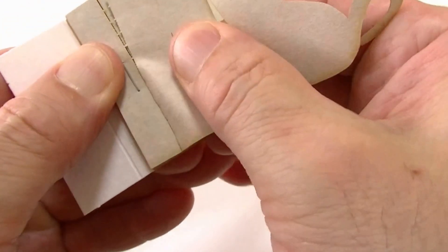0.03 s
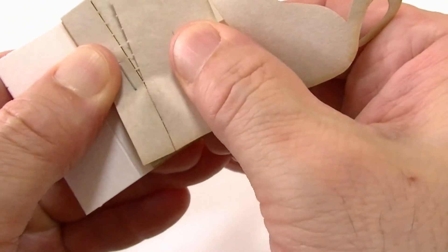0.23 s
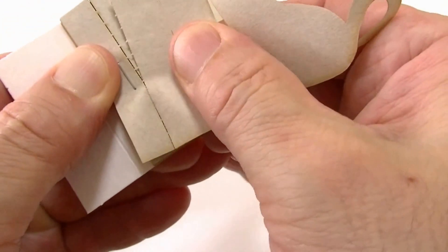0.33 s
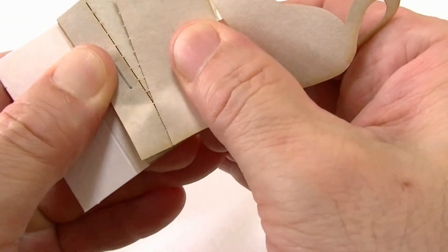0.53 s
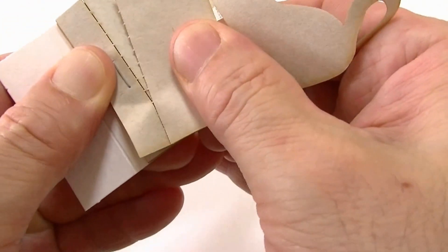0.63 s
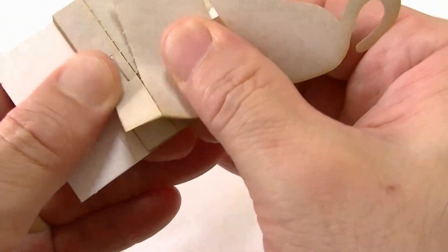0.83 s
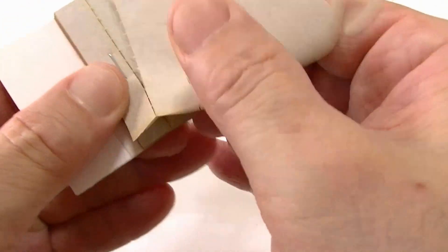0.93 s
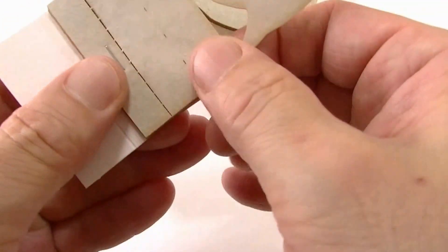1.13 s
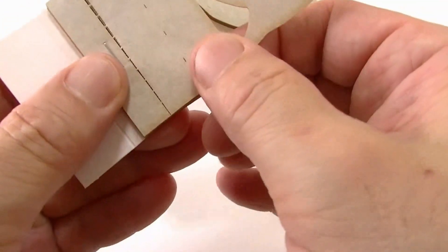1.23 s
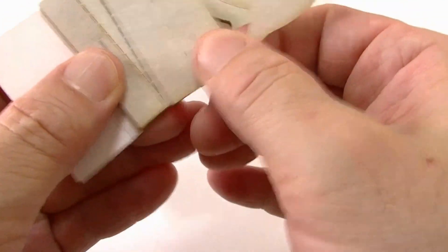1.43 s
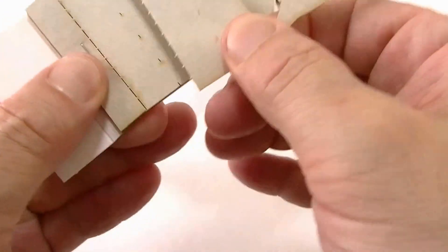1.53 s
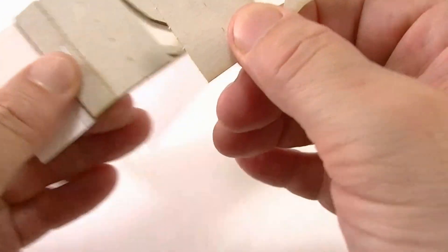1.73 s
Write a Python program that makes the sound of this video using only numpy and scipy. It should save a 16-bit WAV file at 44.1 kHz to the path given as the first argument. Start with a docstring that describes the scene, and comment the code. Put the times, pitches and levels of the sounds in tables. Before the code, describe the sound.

Stiff card tears along a perforation, close up in a small, quiet room. A sharp, slightly hollow snap comes at about 0.2 seconds, and a second cluster follows at around 0.5 seconds. Light fibre ticks and faint rustles of card sliding over card and skin run from 0.8 to 1.4 seconds. A final, slightly softer crackling snap lands at 1.5 seconds, followed by a tick and a faint brush.

```python
"""Stiff card torn along a perforation, bent between two hands close to the microphone.
The bridges between the holes snap in three groups; each snap is a burst of breaking fibres that
flexes the sheet and sets it ringing. In between, single fibres tick and card slides over card and skin.
A small, quiet room answers."""
import sys
import numpy as np
from scipy import signal
from scipy.fft import rfft, irfft
from scipy.io import wavfile
from scipy.ndimage import uniform_filter1d

SR = 44100
rng = np.random.default_rng(int(sys.argv[2]) if len(sys.argv) > 2 else 0)


def generate_wav(signal):
    """Clip the signal to [-1, 1] and save it as 16-bit WAV at the path in sys.argv[1]."""
    frames = np.transpose(np.atleast_2d(signal))
    scaled = np.clip(frames, -1, 1) * 32767
    pcm = np.round(scaled).astype(np.int16)
    wavfile.write(sys.argv[1], SR, pcm)


N = 79380
TIME = np.arange(N) / SR
HZ = np.maximum(np.arange(N // 2 + 1) * SR / N, 1)


def from_db(db):
    """Decibels to gain."""
    return 10 ** (np.asarray(db) / 20)


def unit_rms(x):
    """Scale to an rms of 1."""
    return x / np.sqrt(np.mean(x ** 2) + 1e-20)


def curve(points):
    """Join (Hz, value) points along the log-frequency axis."""
    hz, value = np.transpose(points)
    return np.interp(np.log(HZ), np.log(hz), value)


def bell(hz, octaves):
    """A bell of height 1 around a frequency."""
    return np.exp(-.5 * (np.log2(HZ / hz) / octaves) ** 2)


def equalise(x, db):
    """Minimum-phase EQ with the given gain at each frequency."""
    cepstrum = irfft(np.log(from_db(db)), N)
    cepstrum[1:N // 2] *= 2
    cepstrum[N // 2 + 1:] = 0
    return irfft(rfft(x) * np.exp(rfft(cepstrum)), N)


def stereo_noise(correlation):
    """White noise with the given left-right correlation."""
    mid, side = rfft(rng.standard_normal((2, N)))
    mid_gain, side_gain = np.sqrt((1 + correlation) / 2), np.sqrt((1 - correlation) / 2)
    return irfft(mid_gain * mid + side_gain * side * [[1], [-1]], N)


def room_tone(level_db=-60):
    """A faint, dark bed of air, narrow in the mids and wide at both ends of the spectrum."""
    # Each row: frequency in Hz, gain in dB.
    colour = [(30, -43), (70, -22), (120, -16.5), (200, -7.5), (400, -5.5), (650, -4), (900, 0.5),
              (1500, -7.5), (2500, -13.5), (5000, -19.5), (9000, -24), (15000, -31), (16500, -32)]
    # Each row: frequency in Hz, left-right correlation.
    correlation = [(50, 0), (150, 0.55), (600, 0.69), (2000, 0.55), (6000, 0), (14000, 0)]
    air = equalise(stereo_noise(curve(correlation)), curve(colour))
    return from_db(level_db) * unit_rms(air)


def card_slides(grains_per_s=3600):
    """Friction: dense catching fibres over a fine hiss; each stroke rasps at a resonance of its own."""
    # Each row: start, rise, hold and fall in seconds, level in dB, treble tilt in dB per octave,
    # rasp pitch in Hz, rasp boost in dB.
    strokes = [(0.073, .012, 0.034, 0.013, -70, -3, 3740, 5),
               (0.186, 0.015, .004, 0.0051, -52.5, 6.5, 5500, -3),
               (0.42, 0.017, 0.0072, 0.012, -66.5, -1, 5700, 10),
               (0.484, 0.019, 0.033, 0.015, -55.5, 5, 6000, -3),
               (0.603, 0.022, 0.0046, 0.028, -58.5, 0, 3030, 0),
               (0.755, 0.023, 0.0076, 0.025, -59.5, -0.5, 5540, 5),
               (0.874, 0.015, 0.044, 0.028, -52.5, 2, 5200, 7.5),
               (0.919, 0.016, 0.0056, 0.015, -51, 3.5, 3630, 6),
               (0.955, 0.015, 0.15, 0.1, -63.5, -2, 3660, 1),
               (1.005, .012, 0.0082, 0.015, -47.5, 5.5, 4500, 6),
               (1.017, 0.0027, 0.0012, 0.0029, -39.5, 2.5, 4440, 12),
               (1.192, 0.0096, .004, 0.013, -53, -10.5, 5080, 19),
               (1.196, 0.014, 0.0045, 0.013, -54, -2.5, 824, 10),
               (1.47, 0.019, .012, .008, -51.5, 8, 8500, 2),
               (1.723, 0.042, 0.0082, 0.026, -49.5, 4, 6100, 8)]
    # The tone all strokes share. Each row: frequency in Hz, gain in dB.
    base_colour = [(100, -40), (330, 1), (900, 4.5), (1500, -1.5), (2400, 5), (5500, -1.5), (8000, -4.5),
                   (12000, -7.5), (15000, -17), (16500, -33)]
    out = 0
    for start, rise, hold, fall, db, tilt_db, rasp_hz, rasp_db in strokes:
        grains = rng.standard_normal(N) * (rng.random(N) < grains_per_s / SR)
        friction = unit_rms(grains) + rng.standard_normal(N)
        envelope = np.interp(TIME, start + np.cumsum([0, rise, hold, fall]), [0, 1, 1, 0])
        tilt = tilt_db * np.log2(1 + HZ / 1000)
        colour = curve(base_colour) + tilt + rasp_db * bell(rasp_hz, octaves=0.12)
        scrape = irfft(rfft(friction) * from_db(colour), N)
        out += from_db(db) * envelope * unit_rms(scrape)
    return out


def fracture(start, burst_s, colour_db):
    """A quickly dying volley of fibre breaks, flattened in spectrum and then given its colour."""
    envelope = np.exp(-np.minimum(TIME / burst_s, 20) ** 2 / 2)
    breaks = rng.standard_normal(N) * rng.exponential(1, N) * envelope
    smoothed_power = uniform_filter1d(np.abs(rfft(breaks)) ** 2, size=900)
    own_db = 10 * np.log10(np.abs(smoothed_power) + 1e-12)
    burst = equalise(breaks, colour_db - own_db)
    return np.pad(burst, (int(start * SR), 0))[:N]


def fibre_ticks(burst_s=0.001, skirt_db=-22):
    """Single fibres give way as the fold is strained: tiny fractures, each in its own band."""
    # Each row: start in seconds, level in dB, centre in Hz, width in octaves.
    ticks = [(0.0880, -33.5, 11400, 1), (0.1150, -29.5, 4000, 0.75), (0.2034, -16, 6000, 1.6),
             (0.2058, -16.5, 3500, 0.63), (0.367, -27.5, 3700, 0.58), (0.4223, -37, 7700, 0.45),
             (0.4390, -38, 8000, 0.46), (0.4455, -34, 6950, .6), (0.4530, -38, 8000, .5),
             (0.5010, -27, 11000, 0.87), (0.5144, -9.5, 6030, 0.57), (0.5430, -12, 4940, 1.34),
             (0.5522, -17, 10000, 0.76), (0.8137, -25, 8860, 0.49), (0.8560, -24.5, 3730, 0.54),
             (0.8920, -13, 2360, 0.27), (1.0209, -16, 4170, 0.5), (1.0586, -12, 880, 0.98),
             (1.0582, -21.5, 3360, 0.77), (1.171, -35.5, 4470, 0.95), (1.2287, -30.5, 3900, 1.1),
             (1.2830, -42, 7000, .8), (1.3000, -38.5, 5900, 1), (1.3240, -44, 7860, 0.8),
             (1.3751, -25, 7400, .55), (1.4087, -24, 7400, 1.23), (1.5873, -20.5, 970, 1.5)]
    out = 0
    for start, db, hz, octaves in ticks:
        band_db = 20 * np.log10(bell(hz, octaves) + from_db(skirt_db))
        out += fracture(start, burst_s, db + band_db)
    return out


def card_ring(force):
    """The held sheet rings briefly in its modes."""
    # Each row: frequency in Hz, level in dB, time to fall by 60 dB in seconds.
    modes = [(583, -51, 0.039), (772, -59, 0.059), (983, -68, 0.14), (1200, -60, 0.02), (1352, -47, 0.036),
             (1962, -40.5, .03), (2690, -44.5, 0.035), (3370, -46, 0.026), (3500, -45, 0.026),
             (4540, -41, 0.018), (4460, -56, .02), (5580, -50, 0.023)]
    out = 0
    for hz, db, t60 in modes:
        radius = from_db(-60 / (t60 * SR))
        pole_real = radius * np.cos(2 * np.pi * hz / SR)
        ring = signal.lfilter([1, -pole_real], [1, -2 * pole_real, radius ** 2], force + 1e-18)
        out += from_db(db) * ring
    return out


def bridge_snaps(treble_hz=7000):
    """Each bridge breaks with a hollow knock and a higher crack; the slower bending wave follows."""
    # Each row: start in seconds, level in dB, burst time and flex lag in seconds, flex pitch in Hz and
    # relative level in dB, knock in Hz and boost in dB, crack in Hz and boost in dB, treble shelf in dB.
    snaps = [(0.2085, -2, .0010, 0.00063, 796, 19.5, 3320, 11, 5120, 14, -4),
             (0.21, 1, 0.002, 0.00014, 1890, 5.5, 1880, 9, 4600, 5.5, 1),
             (0.2140, -0.5, 0.0006, 0.000094, 824, 12.5, 3200, -1.5, 7450, 5, 3.5),
             (0.5180, -1.5, 0.00063, 0.00026, 638, 12, 2670, 0.5, 5550, 15, -4.5),
             (0.5189, 1, 0.0011, 0.000067, 640, -3.5, 1470, 10, 2690, 9, -10),
             (0.5457, -1.5, 0.00157, 0.00077, 1306, 3.5, 3150, 3, 5790, 12, -6.5),
             (1.4884, -6.5, 0.0007, 0.00102, 880, 15, 2720, 9, 10940, 11, 3),
             (1.4991, -8, 0.0012, 0.0015, 730, 13, 3380, 13, 6140, 11, 1),
             (1.5088, -7.5, 0.0011, .0010, 300, 7.5, 2460, 5, 3170, 6, 5),
             (1.5107, -6.5, 0.0015, 0.00086, 715, 4, 1100, 8, 3660, 6, 4.5)]
    # The tone all snaps share. Each row: frequency in Hz, gain in dB.
    base_colour = [(30, -23), (100, -26), (180, -17.5), (280, -9), (520, -1.5), (1400, -0.5), (3000, 0.5),
                   (5500, -4), (9000, -3), (13000, -10.5), (16000, -16)]
    shelf = HZ ** 4 / (HZ ** 4 + treble_hz ** 4)
    out = 0
    for (start, db, burst_s, lag_s, flex_hz, flex_db,
         knock_hz, knock_db, crack_hz, crack_db, treble_db) in snaps:
        knock = knock_db * bell(knock_hz, octaves=0.13)
        crack = crack_db * bell(crack_hz, octaves=0.14)
        colour = curve(base_colour) + knock + crack + treble_db * shelf
        out += fracture(start, burst_s, db + colour)
        out += sheet_flex(start + lag_s, flex_hz, db + flex_db)
    return out


def sheet_flex(start, hz, db, q=1.52, radiation_hz=197):
    """The freed sheet springs back: one push into a strongly damped bending resonance."""
    push = np.exp(-2j * np.pi * HZ * start)
    resonance = 1 / (1 + 1j * q * (HZ / hz - hz / HZ))
    radiation = 1j * HZ / (radiation_hz + 1j * HZ)  # a small sheet hardly moves air in the bass
    return from_db(db) * irfft(resonance ** 2 * radiation * push, N)


def reflections(t60, build_s):
    """Diffuse stereo reflections that build up and die away, with an energy of 1."""
    envelope = from_db(-60 * TIME / t60) * (1 - np.exp(-(TIME / build_s) ** 2))
    return unit_rms(stereo_noise(correlation=0.54) * envelope) / np.sqrt(N)


def small_room(x, early_db=-10.5, tail_db=-17.5, split_hz=4800):
    """Early scatter from hands and table, then a short tail whose treble dies sooner."""
    # The tone of the reflections. Each row: frequency in Hz, gain in dB.
    colour = [(100, -6), (400, -2), (900, -0.5), (2000, -0.5), (5000, -1), (9000, -2.5), (15000, -2)]
    lowpass, highpass = (signal.butter(2, split_hz, kind, fs=SR, output="sos") for kind in ("low", "high"))
    tail = signal.sosfilt(lowpass, reflections(t60=0.31, build_s=0.018))
    tail += signal.sosfilt(highpass, reflections(t60=0.25, build_s=0.018))
    early = reflections(t60=0.052, build_s=0.0036)
    response = equalise(from_db(tail_db) * tail + from_db(early_db) * early, curve(colour))
    return signal.fftconvolve(x[None], response, axes=1)[:, :N]


def scene(pan_db=0.48, right_lag_s=16e-6):
    """The card, its room and the room tone, all leaning slightly left."""
    force = bridge_snaps() + fibre_ticks()
    card = force + card_ring(force) + card_slides()
    card_right = irfft(rfft(card) * np.exp(-2j * np.pi * HZ * right_lag_s), N)
    mix = np.array([card, card_right]) + small_room(card) + room_tone()
    return mix * from_db([[pan_db], [-pan_db]])


def record(dry):
    """A steep high cut, 70 dB down from 16650 Hz."""
    return signal.sosfilt(signal.cheby2(16, 70, 16650, fs=SR, output="sos"), dry)


dry = scene()
out = record(dry)
generate_wav(out)
```